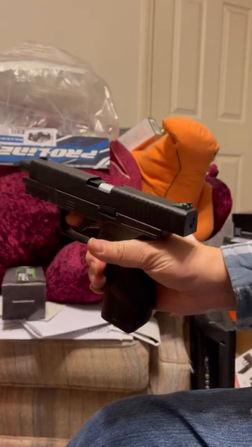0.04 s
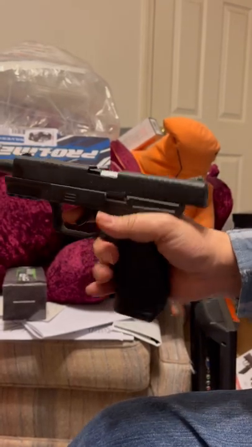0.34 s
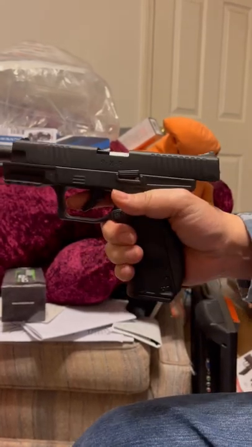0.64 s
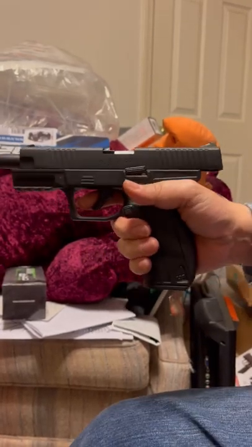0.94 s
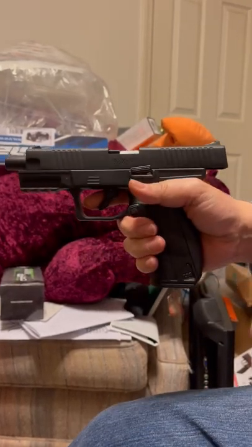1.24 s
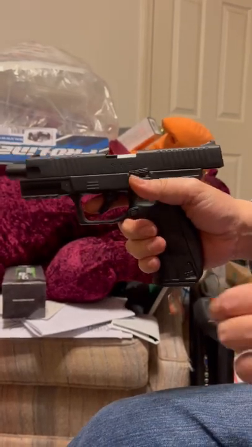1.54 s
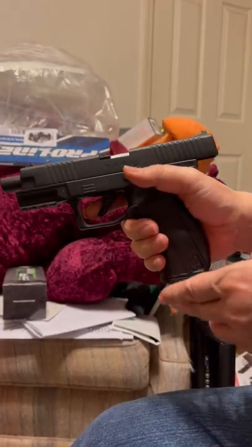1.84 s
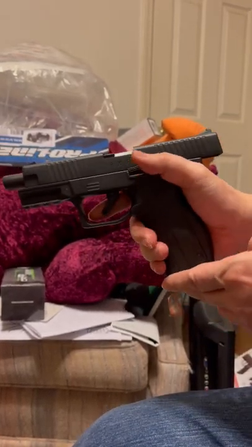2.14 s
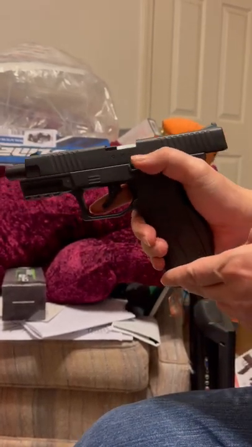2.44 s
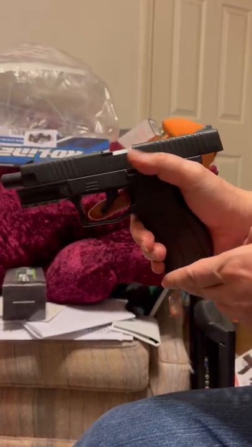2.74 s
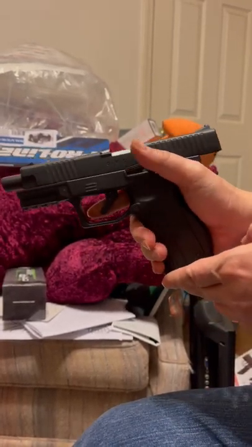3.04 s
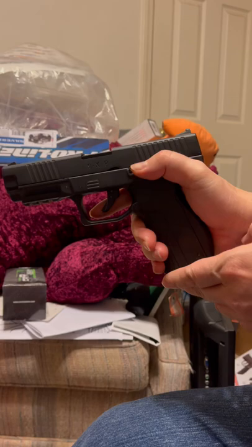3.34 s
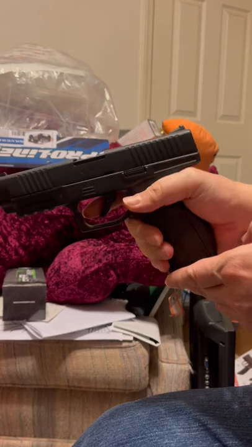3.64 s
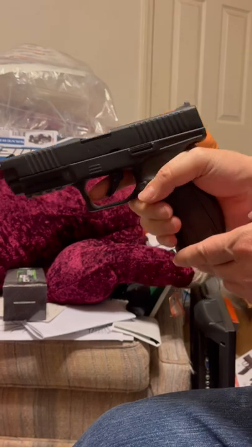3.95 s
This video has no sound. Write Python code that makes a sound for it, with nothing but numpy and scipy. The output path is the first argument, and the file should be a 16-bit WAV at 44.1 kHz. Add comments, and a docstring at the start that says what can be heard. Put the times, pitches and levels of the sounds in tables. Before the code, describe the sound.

A pistol's slide snaps shut with one loud, ringing steel clack. Before it come soft sleeve rustles and small clicks from the handling, and a few more clicks follow, close to the microphone in a quiet room.

```python
"""A sleeve rustles over a low hum in a small, quiet room as a pistol, its slide locked back, is turned
in the hand. The grip bumps the palm and the thumb clicks against the slide stop. At 3.2 s the stop
lets go; the slide scrapes along its rails and slams shut with a ringing steel clack. A few light
clicks follow, and the recoil spring sings faintly."""
import sys
import numpy as np
from scipy import signal
from scipy.fft import rfft, irfft
from scipy.io import wavfile
from scipy.ndimage import uniform_filter1d

SR = 44100
rng = np.random.default_rng(int(sys.argv[2]) if len(sys.argv) > 2 else 0)


def wav_out(sig):
    """Save sig, one row per channel (or a flat mono array), as 16-bit PCM at SR to the path in sys.argv[1]."""
    wavfile.write(sys.argv[1], SR, np.round(np.clip(np.atleast_2d(sig).T, -1, 1) * 32767).astype(np.int16))


N = 176400
TIME_S = np.arange(N) / SR


def from_db(db):
    """Decibels to gain."""
    return 10 ** (np.asarray(db) / 20)


def at_hz(points, hz):
    """Interpolate a table over log frequency."""
    points_hz, values = np.transpose(points)
    return np.interp(np.log(hz + 1), np.log(points_hz), values)


def envelope(points):
    """Gain over time from (t/s, level/dB) points."""
    return from_db(np.interp(TIME_S, *np.transpose(points)))


def add(out, at_s, sound):
    """Mix a sound in at a time."""
    start = int(at_s * SR)
    out[start:start + len(sound)] += sound[:N - start]


def diffuse(colour, size=N):
    """Coloured stereo noise, partly coherent between the two microphone ports; rms 1."""
    # f/Hz, coherence
    coherence = [(100, 0.99), (250, 0.72), (500, 0.7), (1700, 0.28), (3200, 1), (4500, .55), (6000, 0.51),
                 (7300, .8), (9000, 1), (10500, .8), (12500, 0.58)]
    hz = np.fft.rfftfreq(size, 1 / SR)
    alike = np.clip(at_hz(coherence, hz), 0, 1)
    mid, side = rfft(rng.standard_normal((2, size)))
    spectra = np.sqrt(1 + alike) * mid + np.sqrt(1 - alike) * side * [[1], [-1]]
    noise = irfft(spectra * from_db(at_hz(colour, hz)), size)
    return noise / noise.std()


def contact(colour, t60_s, extra_db=0, size=8192):
    """A crack of dense, fast-dying modes, causally filtered; energy equal to 2 ms at rms 1."""
    burst = rfft(rng.standard_normal(size) * from_db(-60 * TIME_S[:size] / t60_s))
    burst /= np.sqrt(uniform_filter1d(np.abs(burst) ** 2, size=140))  # whiten
    colour_db = at_hz(colour, np.fft.rfftfreq(size, 1 / SR)) + extra_db
    cepstrum = irfft(np.log(from_db(colour_db)))
    minimum_phase = np.exp(rfft(2 * cepstrum[:size // 2], size))
    crack = irfft(burst * minimum_phase)[:size // 2]
    return crack * np.sqrt(SR / 500 / np.sum(crack ** 2))


def contacts(hits, colour):
    """Contacts of one colour from (t/s, level/dB, t60/s) rows."""
    out = np.zeros(N)
    for at_s, db, t60_s in hits:
        add(out, at_s, from_db(db) * contact(colour, t60_s))
    return out


def ring(modes):
    """One second of struck modes: decaying sines of random polarity."""
    t = TIME_S[:SR]
    return sum(from_db(db - 60 * t / t60_s) * np.sin(2 * np.pi * hz * t) * rng.choice([-1, 1])
               for hz, db, t60_s in modes)


def room_hum():
    """A low hum of drifting level, faint steady tones and the room's still air."""
    # hum: t/s, level/dB
    hum_levels = [(0, -62), (.8, -61.5), (.95, -58.5), (1.38, -57), (1.46, -72), (1.8, -66), (2.02, -60),
                  (2.2, -65), (2.9, -64.5), (3.4, -63), (3.6, -78), (4, -74.5)]
    # spectra: f/Hz, level/dB
    hum_colour = [(20, -20.5), (45, -15.5), (60, -11.5), (71, 5.5), (85, -10.5), (110, -9.5), (200, -31),
                  (500, -79.5)]
    hum_tones = [(222, -86.5), (392, -89), (882, -99)]
    air_colour = [(20, -11), (50, -3), (100, 0), (200, -7), (350, -15), (500, -19), (850, -23), (1000, -25),
                  (1600, -31), (3000, -34), (6000, -35), (11500, -31), (13000, -43), (15000, -58)]
    air_db = -72.5
    hum = envelope(hum_levels) * diffuse(hum_colour)
    tones = sum(from_db(db) * np.sin(2 * np.pi * hz * TIME_S) for hz, db in hum_tones)
    return hum + tones + from_db(air_db) * diffuse(air_colour)


def sleeve():
    """Cloth and skin rub in small catches: a hiss with a fine grain."""
    # rubbing: t/s, level/dB
    rub_levels = [(0, -97), (.265, -82.5), (.29, -68.5), (.42, -70), (.5, -79.5), (.56, -81.5), (.6, -73.5),
                  (.84, -71.5), (.98, -85), (1.35, -91), (1.57, -78), (1.61, -73.5), (1.78, -75),
                  (1.85, -80.5), (1.92, -77), (1.94, -73), (2.03, -68.5), (2.14, -89.5), (2.65, -106),
                  (2.78, -64), (2.86, -97), (2.93, -85), (2.99, -99), (3.16, -76.5), (3.5, -85),
                  (3.56, -74.5), (3.65, -68), (3.8, -101), (4, -82)]
    # spectrum: f/Hz, level/dB
    rub_colour = [(200, -21), (800, -7.5), (1600, 2.5), (2800, -3.5), (4500, -6), (6500, -6.5),
                  (8500, -9.5), (11000, -7), (13500, -31)]
    grains_per_s, grain_db = 750, 2.5
    grain = np.interp(TIME_S * grains_per_s, np.arange(N), rng.standard_normal(N))
    return envelope(rub_levels) * from_db(grain_db * grain) * diffuse(rub_colour)


def grip_bumps():
    """The grip bumps dully in the palm."""
    # t/s, level/dB, t60/s
    bumps = [(.853, -48.5, 0.086), (.973, -49, 0.1)]
    # spectrum: f/Hz, level/dB
    bump_colour = [(60, 7), (200, 10), (380, 6), (700, -4), (1100, -40), (4000, -42)]
    return contacts(bumps, bump_colour)


def lever_clicks(size=8192):
    """Light contacts of lever and frame, each with one resonance of the part touched."""
    # t/s, level/dB, bass/dB, treble/dB, t60/s, resonance/Hz
    clicks = [(.8525, -59.5, 24, -4, 0.015, 720), (1.866, -59.5, 7, 13, 0.037, 6500),
              (2.3271, -44, 2, 29, 0.015, 2690), (2.333, -43.5, 0.5, -11, 0.029, 1650),
              (2.474, -67, 1, 25, .05, 2850), (2.559, -37, 6, -1.5, 0.047, 1680),
              (2.5655, -51, -29, 9, 0.042, 1700), (2.685, -56, 2, 10, 0.12, 2310),
              (2.697, -60, -13, 38, 0.018, 2500), (2.7295, -48, 3, -13, 0.042, 1470),
              (2.7445, -43, 15, 3.5, 0.019, 1700), (2.798, -51.5, 14, 17.5, 0.061, 1800),
              (2.809, -56, 0, 31, 0.059, 2200), (2.8225, -42, 1.5, -20, .018, 1645),
              (2.835, -49, 12, -27, .02, 1110), (2.927, -65, -16, 16, 0.11, 3120),
              (3.088, -56, -8, 2, .015, 2930), (3.0915, -45, -4, 6.5, 0.02, 1570),
              (3.114, -49, 14, -22, 0.093, 1230), (3.147, -62, 8, -12, 0.027, 1600),
              (3.340, -38, -3, 4.5, 0.032, 2950), (3.423, -57, 14, -5, 0.055, 1560),
              (3.535, -47, 5.5, 12.5, 0.024, 2100), (3.5955, -41.5, 0.5, 14, 0.014, 2200),
              (3.606, -42.5, -18, 14, 0.015, 1890), (3.678, -39.5, -14, 0, 0.024, 2640),
              (3.733, -44, 1.5, -27, 0.026, 1715), (3.741, -51.5, 6, -6, 0.027, 1630),
              (3.784, -59, -6, 23.5, 0.041, 2774), (3.904, -66, 4, -16, .02, 1570),
              (3.987, -52.5, -10.5, -12, .04, 2300)]
    # base spectrum: f/Hz, level/dB
    click_colour = [(100, -25), (350, -15.5), (800, -4), (1200, -2), (1650, 0), (2500, -2), (4000, -2.5),
                    (7000, -18.5), (11500, -19.5), (13000, -35.5), (15000, -52)]
    bass_hz, treble_hz = 1000, 3800
    peak_db, half_width_oct = 10.5, .18
    hz = np.fft.rfftfreq(size, 1 / SR)
    bass_shelf = 1 / (1 + (hz / bass_hz) ** 4)
    treble_shelf = 1 - 1 / (1 + (hz / treble_hz) ** 4)
    out = np.zeros(N)
    for at_s, db, bass_db, treble_db, t60_s, resonance_hz in clicks:
        offset_oct = np.log2((hz + 1) / resonance_hz)
        resonance_db = peak_db / (1 + (offset_oct / half_width_oct) ** 2)
        timbre_db = bass_db * bass_shelf + treble_db * treble_shelf + resonance_db
        add(out, at_s, from_db(db) * contact(click_colour, t60_s, timbre_db, size))
    return out


def slide():
    """Released, the slide scrapes along its rails and slams; the hardest blow rings the steel."""
    # the stop lets go: t/s, level/dB, t60/s
    release = [(3.2016, -15.5, 0.013)]
    # rail friction: t/s, level/dB
    rail_levels = [(3.19, -74.5), (3.2, -53.5), (3.205, -36.5), (3.23, -46.5), (3.238, -27.5), (3.256, -42),
                   (3.26, -100)]
    # the slide picks up the barrel, slams home, rebounds: t/s, level/dB, t60/s
    slams = [(3.233, -31.5, 0.014), (3.2575, -5, 0.035), (3.2602, -11, 0.019), (3.2705, -17, 0.075)]
    # spectra: f/Hz, level/dB
    release_colour = [(100, -42), (500, -41.5), (1000, -17.5), (1630, 3), (2100, -5.5), (2600, -4),
                      (4300, -17), (5500, -13.5), (7500, -25.5), (11000, -23.5), (15000, -38)]
    rail_colour = [(200, -16), (800, 1.5), (1500, 5.5), (3000, 5), (4200, -3), (6000, -3.5), (8000, -15),
                   (11500, -4.5), (14000, -37)]
    slam_colour = [(100, -37), (230, -42), (380, -17), (600, -25), (900, -2), (1400, -14.5), (1900, -7),
                   (2650, 2.5), (4000, -2), (5300, 3), (7000, -10), (9000, 2.5), (11500, -10),
                   (13500, -31.5), (16000, -40)]
    # slide and barrel: f/Hz, level/dB, t60/s
    steel_modes = [(874, -10, .1), (1151, -7, .1), (1658, -7, .08), (2022, -10, .16), (2342, -3, .08),
                   (2680, -3, .09), (2751, -3, .09), (3082, -5, .14), (3384, -2, .11), (3449, -4, .16),
                   (3613, 4, .11), (4190, -13, .2), (4700, -10, .17), (5283, 6, .11), (5584, -1, .1),
                   (6100, 0, .16), (7036, -6, .12), (8058, -1, .15), (8700, -2, .13), (9410, 2, .09),
                   (9840, -9, .18), (10237, -3, .13), (10980, -4, .11), (11400, -13, .2)]
    steel_db = -25
    blows = contacts(release, release_colour) + contacts(slams, slam_colour)
    hardest_s = max(slams, key=lambda row: row[1])[0]
    add(blows, hardest_s, from_db(steel_db) * ring(steel_modes))
    moving = (TIME_S > rail_levels[0][0]) & (TIME_S < rail_levels[-1][0])
    scrape = moving * envelope(rail_levels) * diffuse(rail_colour)[0]
    return blows + scrape


def recoil_spring():
    """The spring is set singing in a few slowly dying modes."""
    # t/s, level/dB
    pings = [(3.342, -56), (3.678, -55.5)]
    # f/Hz, level/dB, t60/s
    spring_modes = [(1217, -5, .4), (2020, -12, .5), (3074, -4, .18), (4167, -1, .25), (5500, -6, .16)]
    out = np.zeros(N)
    for at_s, db in pings:
        add(out, at_s, from_db(db) * ring(spring_modes))
    return out


def in_room(dry, wet_db, size=SR // 2):
    """Direct sound plus a diffuse tail that lasts longest in the bass."""
    # room decay: f/Hz, t60/s
    decays = [(150, .35), (1000, 0.12), (3000, 0.24), (7000, 0.21), (11000, 0.18), (13500, 0.18)]
    delay_s = .005
    t, hz = TIME_S[:size], np.fft.rfftfreq(size, 1 / SR)
    centres_hz, t60s_s = np.transpose(decays)
    noise = rfft(diffuse([(100, .0076), (16000, .0043)], size))  # nearly white
    tail = np.zeros((2, size))
    for weights, t60_s in zip(np.eye(len(decays)), t60s_s):
        band = at_hz(list(zip(centres_hz, weights)), hz)
        tail += irfft(noise * band, size) * from_db(-60 * t / t60_s)
    tail *= np.clip(t / delay_s - .5, 0, 1)
    tail /= np.sqrt(np.sum(tail ** 2) / 2)
    return dry + from_db(wet_db) * signal.fftconvolve(dry[None], tail, axes=1)[:, :N]


def near_reflections(sound, wet_db=-13, t60_s=.0047, size=512):
    """Add close reflections off hands and lap, different at each port."""
    echoes = rng.standard_normal((2, size)) * from_db(-60 * TIME_S[:size] / t60_s)
    echoes /= np.sqrt(np.sum(echoes ** 2) / 2)
    return sound + from_db(wet_db) * signal.fftconvolve(sound, echoes, axes=1)[:, :N]


def scene():
    """The pistol close by and slightly right, the hum slightly left, and the sleeve."""
    pistol_pan_db, hum_pan_db = [[-.5], [.5]], [[.6], [-.6]]
    handling = grip_bumps() + lever_clicks() + recoil_spring()
    pistol = near_reflections(in_room(handling, wet_db=-13) + in_room(slide(), wet_db=-16))
    return pistol * from_db(pistol_pan_db) + room_hum() * from_db(hum_pan_db) + sleeve()


def record(dry):
    """The two ports differ in phase; peaks are rounded and the top is cut."""
    # f/Hz, lead of left port/rad
    port_phase = [(100, 0), (400, -.15), (550, -.7), (1000, -.75), (1300, 0), (2100, 0), (2800, .7),
                  (3900, .7), (4900, 2.9), (5700, 6.1), (6300, 6.4), (8400, 9.3), (9500, 9.5),
                  (12000, 12.5), (16000, 12.7)]
    ceiling, cutoff_hz = .9, 15900
    size = N + SR
    lead_rad = at_hz(port_phase, np.fft.rfftfreq(size, 1 / SR))
    rotation = np.exp(.5j * lead_rad * np.array([[1], [-1]]))
    ports = irfft(rfft(dry, size) * rotation, size)[:, :N]
    rounded = ceiling * np.tanh(ports / ceiling)
    lowpass = signal.cheby2(12, 70, cutoff_hz, fs=SR, output="sos")
    return signal.sosfilt(lowpass, rounded)


dry = scene()
out = record(dry)
wav_out(out)
```